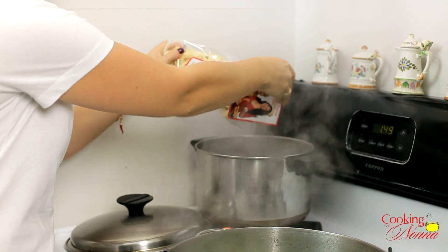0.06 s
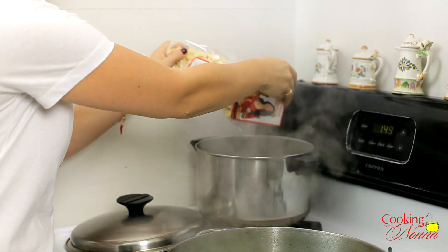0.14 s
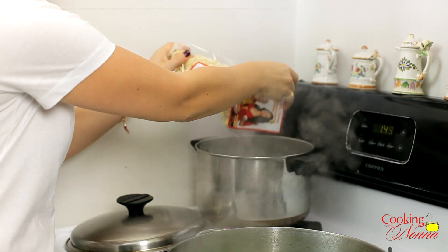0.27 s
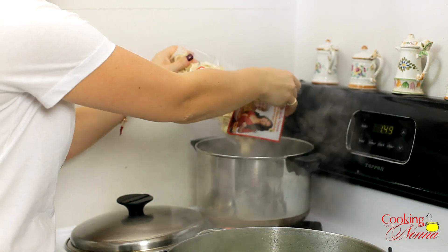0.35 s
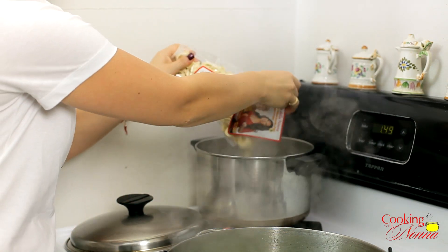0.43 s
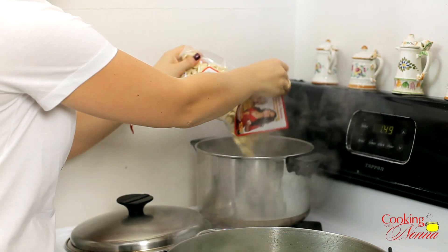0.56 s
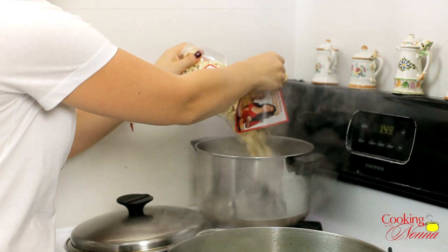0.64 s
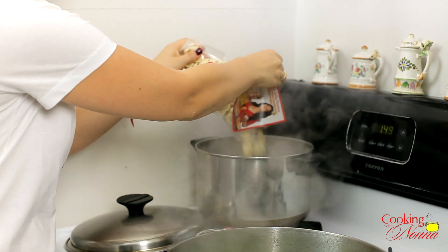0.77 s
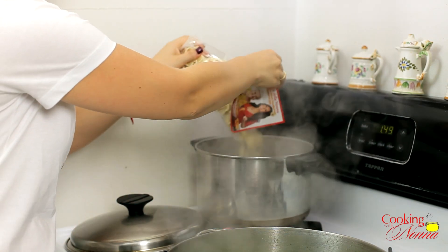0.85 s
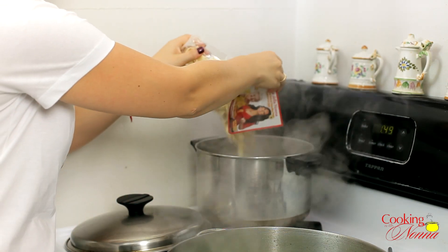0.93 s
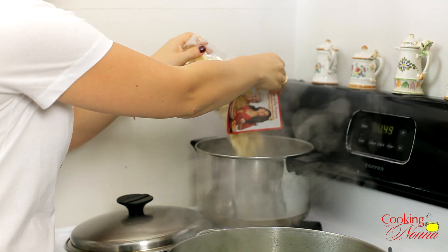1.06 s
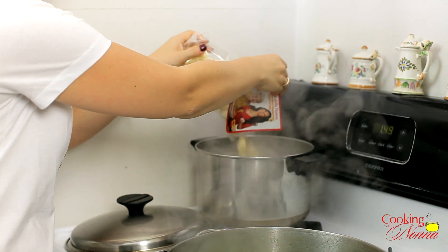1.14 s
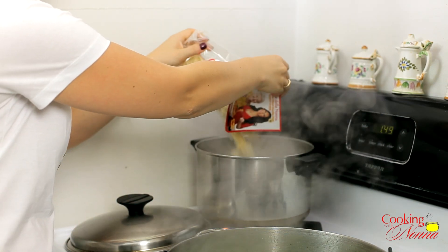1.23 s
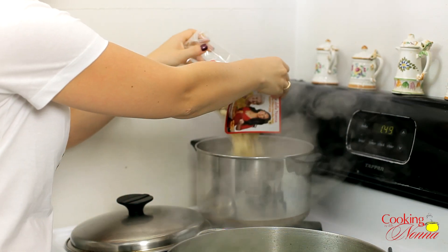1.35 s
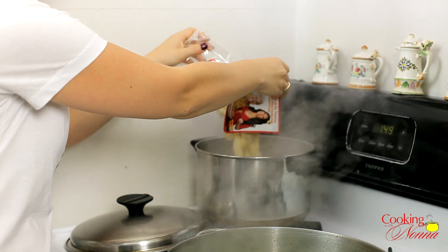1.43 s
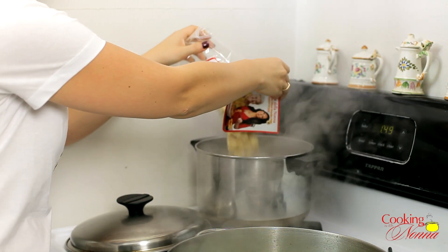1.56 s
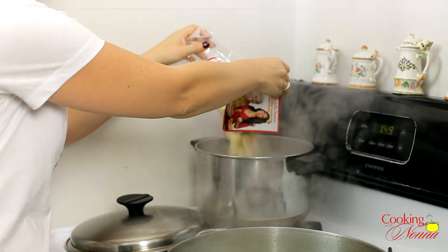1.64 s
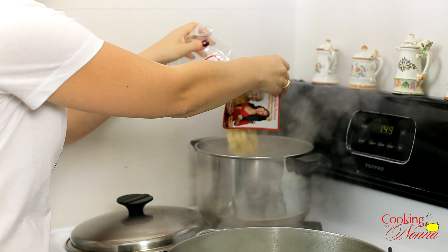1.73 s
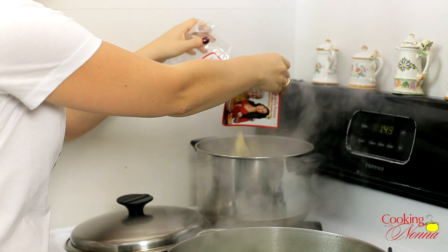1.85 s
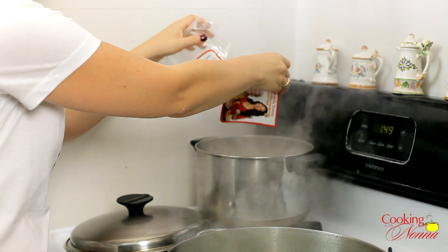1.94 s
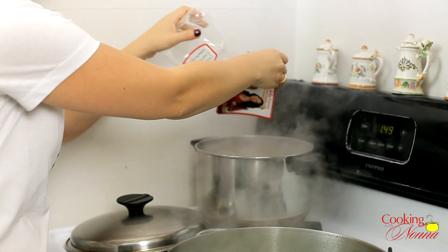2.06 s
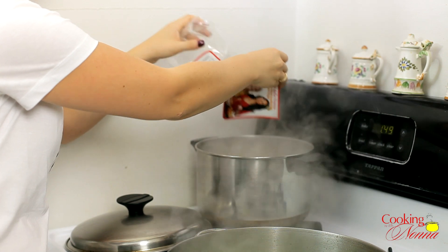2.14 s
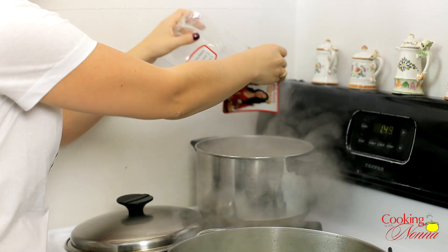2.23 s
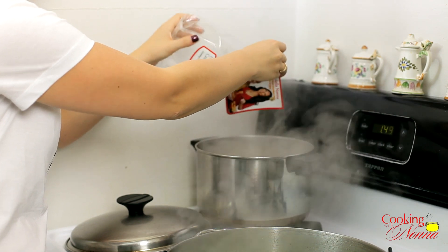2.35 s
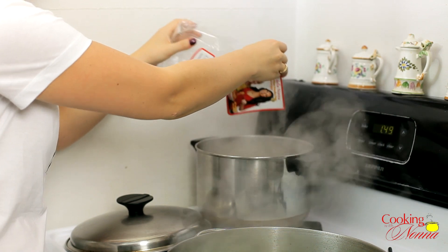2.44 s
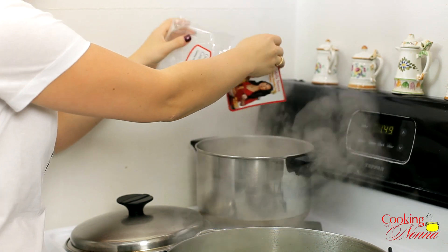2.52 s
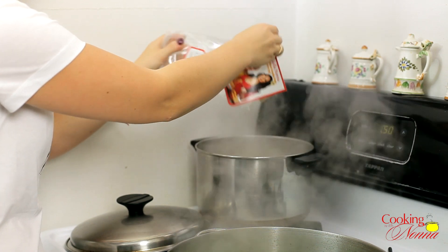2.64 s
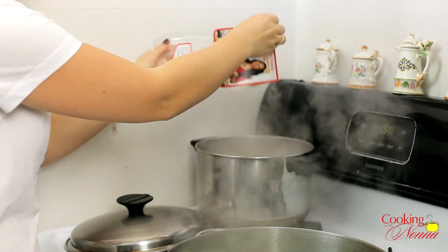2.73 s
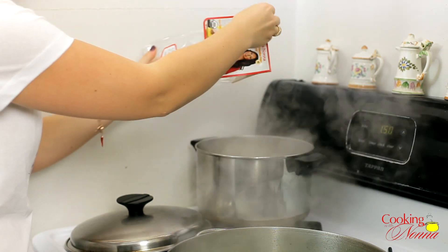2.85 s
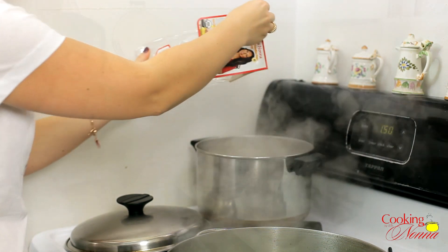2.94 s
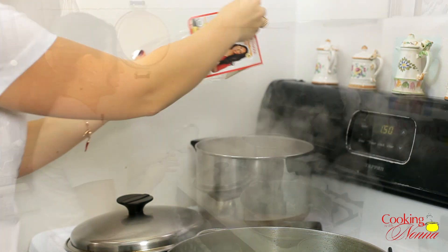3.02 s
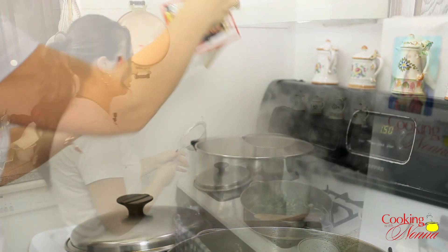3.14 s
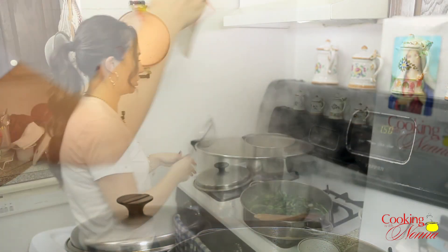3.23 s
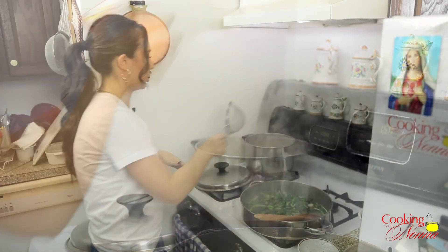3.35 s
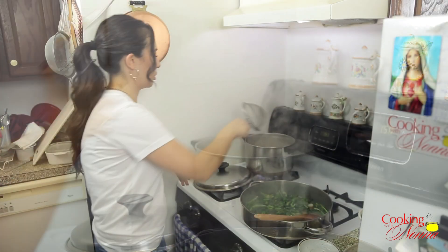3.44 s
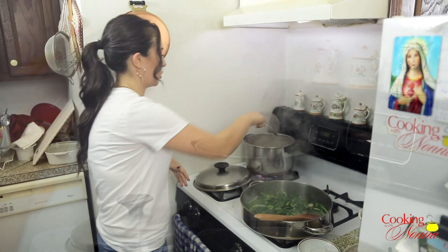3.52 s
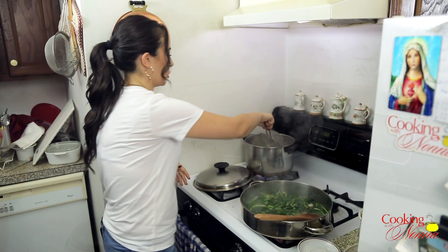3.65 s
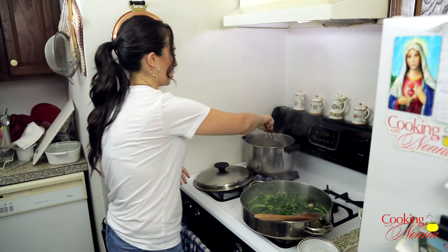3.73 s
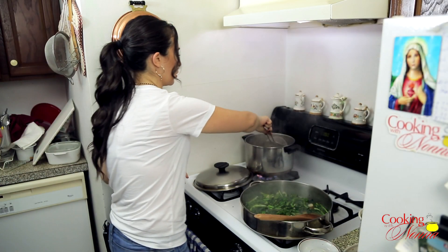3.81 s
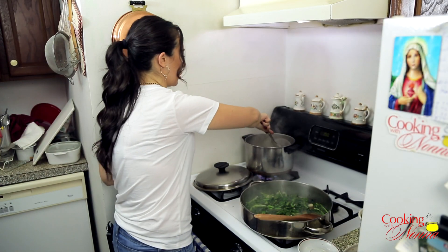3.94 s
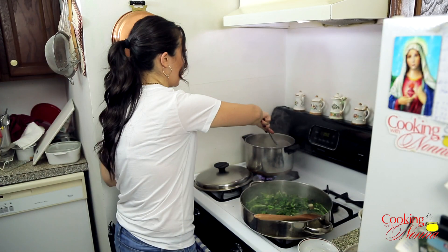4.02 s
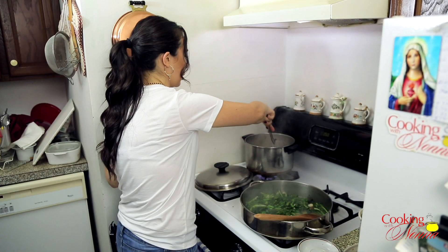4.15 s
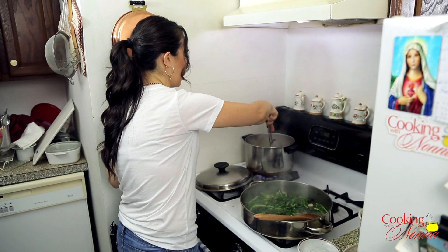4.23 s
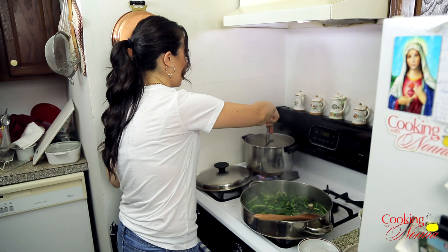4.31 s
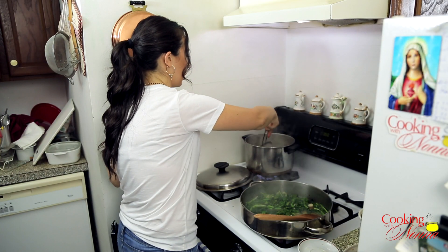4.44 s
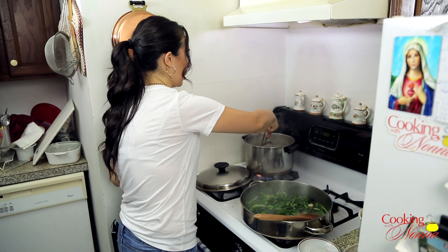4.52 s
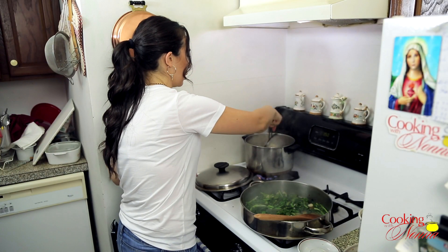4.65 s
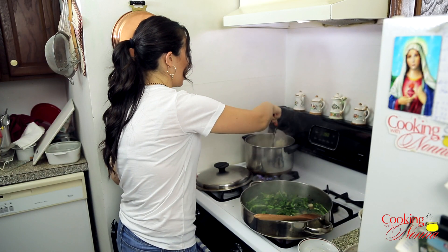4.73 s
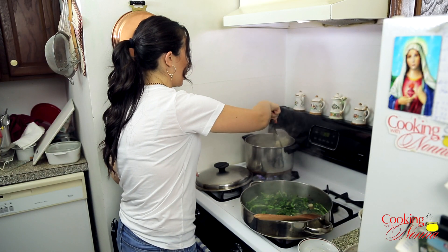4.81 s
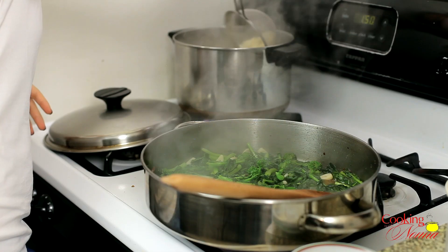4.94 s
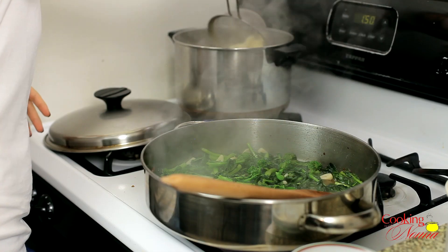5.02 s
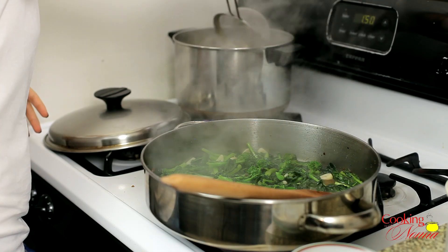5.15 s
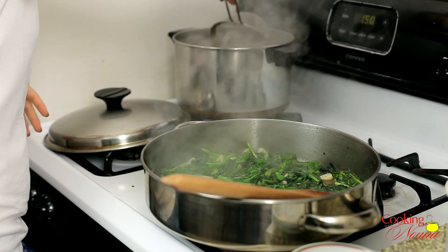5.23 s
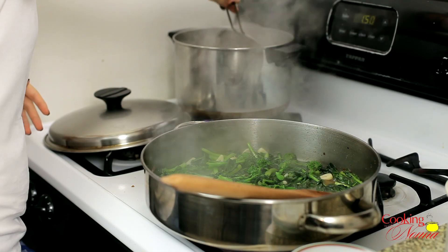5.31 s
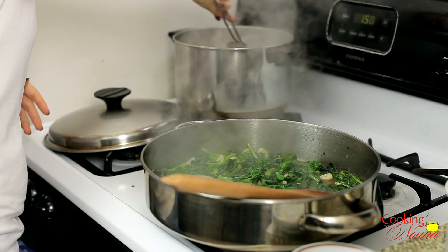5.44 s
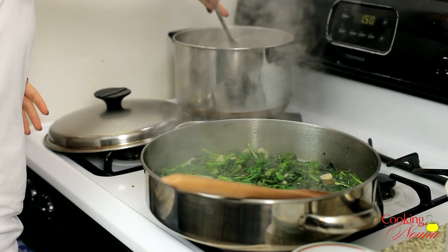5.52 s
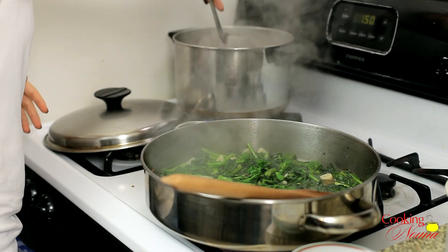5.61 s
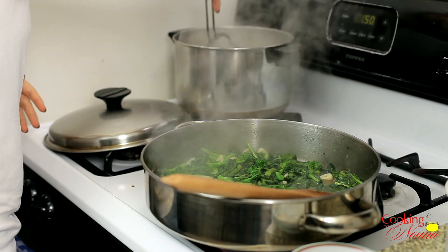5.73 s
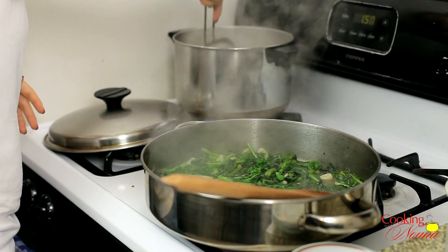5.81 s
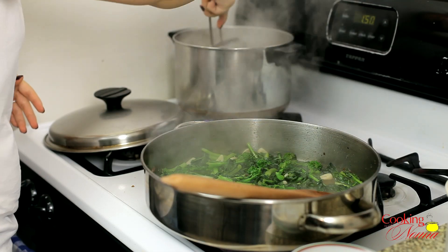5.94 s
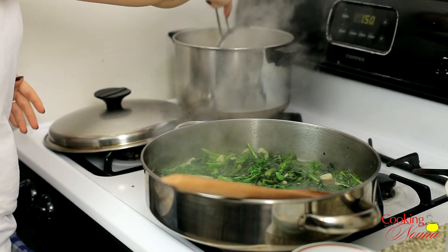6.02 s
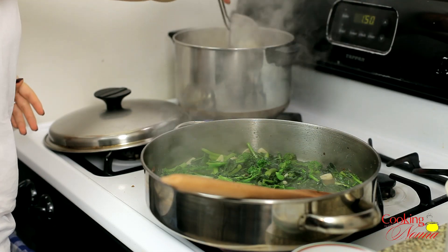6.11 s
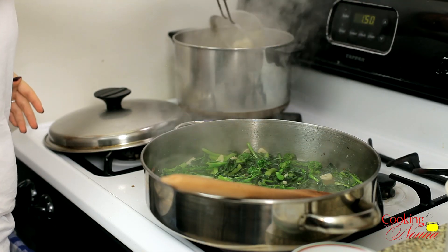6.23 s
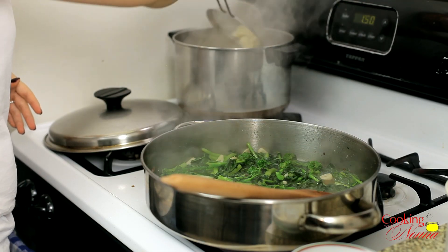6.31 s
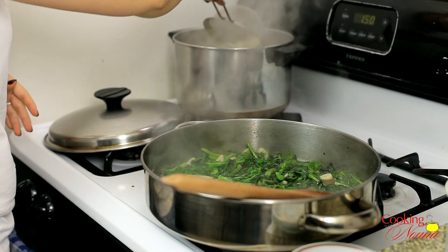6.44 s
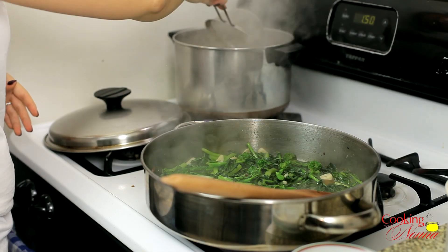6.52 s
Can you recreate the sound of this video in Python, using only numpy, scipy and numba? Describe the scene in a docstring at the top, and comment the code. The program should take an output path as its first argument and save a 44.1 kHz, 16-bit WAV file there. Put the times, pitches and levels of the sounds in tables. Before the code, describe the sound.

A plastic bag crackles sharply as dry pasta rattles into simmering water, then a metal skimmer plunges, knocks the pot and stirs quietly.

```python
"""A small kitchen in mono: from the start a pot simmers and a pan sizzles over a low rumble and appliance hum.
A plastic bag crackles as its film buckles; dry pasta slides out, rattling and plopping into the steel pot.
The empty bag is shaken and lifted away; after a soft bump, a metal skimmer plunges in and knocks on the pot.
It stirs a long, a short and a long stroke: filtered bubbles and noise, with air gulping behind the skimmer.
Close surfaces scatter the treble and the room adds a faint tail; the recorder cuts the top."""
import sys
import numpy as np
from scipy import signal
from scipy.fft import rfft, irfft
from scipy.io import wavfile
from scipy.ndimage import uniform_filter1d
from numba import njit

SR = 44100
rng = np.random.default_rng(int(sys.argv[2]) if len(sys.argv) > 2 else 0)


def store_pcm(level_fs):
    """Save levels as 16-bit WAV."""
    pcm = np.round(np.clip(level_fs, -1, 1) * 32767).astype(np.int16)
    wavfile.write(sys.argv[1], SR, np.atleast_2d(pcm).T)


N = 289737
TIME = np.arange(N) / SR

# shared level of simmer and sizzle, strongest at first: time_s, gain_db
STOVE_LEVEL = [(0, 9.5), (2.7, -1), (6.57, -0.4)]
# spectrum of the simmering water: frequency_hz, gain_db
SIMMER_COLOUR = [(30, -11), (90, -21.5), (160, -5), (230, -7.5), (350, -4), (440, -11), (550, -0.5),
                 (720, -15), (1050, -11), (1700, -22.5), (4500, -33.5)]
# spectrum of the fine sizzle in the pan: frequency_hz, gain_db
SIZZLE_COLOUR = [(1500, -9.5), (3500, -5.5), (5000, -8), (7500, -3.5), (9800, 4), (12000, -0.5),
                 (16000, -8.5)]
# level of the low rumble, which ends weaker: time_s, level_db
RUMBLE_LEVEL = [(0, -64.5), (3.6, -62), (4.3, -65), (6.57, -74.5)]
# spectrum of the rumble: frequency_hz, gain_db
RUMBLE_COLOUR = [(15, 0.5), (30, 6), (70, -6), (120, -4), (250, -30.5), (1000, -58)]
# hum of the kitchen's appliances: pitch_hz, mean_level_db
HUM = [(119.6, -73), (205, -71), (241, -73.5), (345, -75)]
SIMMER_WAVER_DB = 1.3

# the bag's film buckles: start_s, level_db, midrange_share_db, flap_share_db (both before trim), patch_pitch_hz
CRINKLES = [(0.001, -26.5, -12.5, -18.5, 920), (0.07, -25, -13, -32, 1110), (0.088, -21, -12.5, -24, 1090),
            (0.139, -18.5, -15, -19, 704), (0.261, -43, 1.5, -36, 1450), (0.274, -32, -6.5, -36, 1420),
            (0.299, -26, -9.5, -30, 1490), (0.372, -38, -2.5, -30, 730), (0.409, -38.5, -3.5, -26, 1090),
            (0.453, -35, -10.5, -24, 1760), (0.485, -21.5, -16.5, -14.5, 880),
            (0.519, -22, -20, -16.5, 805), (0.565, -30, -16, -44, 2260), (0.635, -18, -13.5, -26, 1800),
            (0.673, -16, -18.5, -22, 1500), (0.681, -16, -18.5, -23.5, 1120), (0.92, -21, -33, -25, 1100),
            (1.324, -25.5, -6.5, -16.5, 1000), (1.372, -16, -16, -27, 1000), (1.502, -16, -14.5, -25, 885),
            (1.89, -23, -29, -19, 1010), (2.145, -40.5, -11, -36, 1080), (2.196, -44.5, -15, -28, 1094),
            (2.248, -53, -5, -7, 2400), (2.307, -49, -25, -18, 1100), (2.353, -46.5, -25, -17, 1100),
            (2.489, -37, -4.5, -25, 1020), (2.5, -38.5, -1, -31, 1110), (2.58, -44, -8, -16, 1600),
            (2.613, -27.5, -9.5, -30, 2140), (2.816, -44, -2, -16, 840), (2.84, -30, -14, -12.5, 856),
            (2.851, -21, -18.5, -20, 840), (2.9, -33, -4.5, -27, 1000), (2.908, -35, -10, -31, 950),
            (2.919, -20, -10.5, -17.5, 895), (2.944, -29.5, -12, -26, 1800),
            (2.962, -34.5, -8.5, -35, 1090), (2.991, -54, -9, -30, 1400), (3.005, -39.5, -9, -31, 1100),
            (3.097, -28, -17, -19, 1100), (3.102, -23.5, -10.5, -25.5, 1140), (3.203, -57.5, 1.5, -10, 555),
            (3.264, -47.5, -15, -17, 1100)]
# the film slides in the hands: peak_s, level_db (before the mix of rub), rise_s, fall_s
RUSTLES = [(0.11, -44.5, 0.17, 0.06), (0.308, -32, 0.024, 0.018), (0.62, -36.5, 0.22, 0.046),
           (2.3, -64.5, 0.14, 0.1), (2.86, -33, 0.042, 0.022), (2.92, -36, 0.013, 0.042)]
# midrange spectrum of the film: frequency_hz, gain_db
FILM_MID_COLOUR = [(80, -26), (220, 0.5), (330, 0.5), (440, -4.5), (560, 1), (900, 0.5), (1200, -2),
                   (1700, -7), (2300, -9), (3200, -23.5), (9000, -24)]
# treble spectrum of the film: frequency_hz, gain_db
FILM_TOP_COLOUR = [(500, -23.5), (2000, -5), (3500, 1.5), (7000, 2.5), (10500, 5), (13000, 2.5),
                   (16000, -19.5)]
# high ring of a sharp crease: pitch_hz, width_hz, gain_db
CREASE_RING = [(9300, 2700, 0)]
SNAP_S, PATCH_Q = 0.001, 3.5  # decay of the sharp snap; sharpness of the buckling patch

# flow of pasta out of the bag: time_s, level_db
POUR_FLOW = [(0.56, -54), (0.65, -40.5), (0.83, -38.5), (0.95, -43), (1.135, -39), (1.17, -34), (1.45, -32),
             (1.52, -30), (1.87, -31.5), (2.02, -33.5), (2.045, -43.5), (2.08, -42)]
# clumps of pasta clack together: start_s, level_db (before trim), pitch_hz
CLACKS = [(0.604, -22.5, 5860), (0.767, -26.5, 8260), (0.802, -20.5, 3240), (0.823, -22.5, 7450),
          (0.891, -22.5, 7750), (0.9655, -26, 4880), (0.994, -23, 8140), (1.0768, -20, 7600),
          (1.1602, -17, 9800), (1.2328, -17, 8300), (1.261, -18, 10000), (1.312, -16.5, 9100),
          (1.597, -19, 9050), (1.736, -15.5, 9400), (1.893, -20, 8700), (1.932, -15.5, 7500),
          (1.963, -15, 9700), (2.016, -18, 9000), (2.0537, -25.5, 8500)]
# spectrum of pasta rattling: frequency_hz, gain_db
RATTLE_COLOUR = [(800, -8.5), (2000, -18.5), (4000, -4), (6000, 0.5), (8000, 4.5), (10000, 8), (11800, 0),
                 (16000, -16)]
# spectrum of pasta splashing: frequency_hz, gain_db
SPLASH_COLOUR = [(25, 1.5), (100, -3), (250, -1), (340, -1.5), (440, -6.5), (600, -1), (820, 0.5),
                 (1100, 2.5), (1700, -2), (3200, -6), (6000, -9.5)]
# air above the water in the pot: pitch_hz, width_hz, gain_db
POT_AIR = [(366, 50, -6), (586, 60, 5), (769, 26, -5.5), (972, 64, -8.5), (1205, 48, -8.5), (1394, 11, -3),
           (2170, 87, 0), (2476, 145, -4.5), (3300, 197, -4), (4100, 61, -13), (6320, 50, -11)]
CLATTER_HZ, CLATTER_WANDER_OCT = 8000, 0.28
RATTLE_POT_SHARE = 0.6  # gain of the pot's air in the rattle
RATTLE_DB, SPLASH_DB, SETTLE_S = -0.5, -1.04, 0.0093  # shares at mid pour; time for the water to calm
MID_POUR_S, HEAP_DB_PER_S = 1.41, 3.5  # as pasta heaps up in the pot, rattle gains and splash loses at this rate

# a soft, deep bump: start_s, peak_db
BUMPS = [(3.356, -47)]
BUMP_FIRST_HZ, BUMP_LAST_HZ, BUMP_FALL_S = 158, 45, 0.017

# pockets of air gulp behind the skimmer: peak_s, level_db, pitch_hz (at the peak)
GULPS = [(3.745, -58, 520), (4.04, -57.5, 1260), (4.41, -56.5, 1080), (4.55, -53, 505), (5.78, -62, 960),
         (5.91, -51.5, 523), (6.48, -54.5, 597)]
GULP_RISE_S, GULP_FALL_S, GULP_SAG_OCT_PER_S, GULP_Q = 0.018, 0.024, 1.5, 6

# the skimmer plunges in with a falling gulp: time_s, level_db, pitch_hz
PLUNGE = [(3.878, -61, 3000), (3.895, -50, 1920), (3.902, -42, 655), (3.925, -53, 603), (3.965, -69, 517)]
PLUNGE_Q = 6

# the skimmer meets the pot: start_s, level_db, hollow_share_db, ring_share_db, tick_share_db (shares before
# trim), bright_hz (favoured pitch of the ring)
KNOCKS = [(3.878, -42.5, -23, -8.5, -5, 6830), (3.898, -34, -12, -22, -15, 1920),
          (3.914, -25.5, -20, -8.5, -14.5, 6840), (3.923, -30.5, -8.5, -20, -24, 4330),
          (4.561, -45.5, -8, -24, -20, 3390), (5.094, -45.5, -11, -18, -9.5, 2160),
          (5.13, -46, -8, -12, -17, 3650), (5.219, -45.5, -5.5, -27, -10.5, 2000),
          (5.491, -36, -14.5, -11.5, -17.5, 1730), (6.353, -57, -25, -20, -1.5, 7060),
          (6.413, -59, -22, -10, 1.5, 3660), (6.463, -40, -11.5, -10, -22, 3300),
          (6.5, -45.5, -16, -7, -28, 2500), (6.519, -47, -17, -10.5, -28, 2480)]
# steel pot and skimmer, damped by water: pitch_hz, width_hz, gain_db
STEEL = [(1860, 60, 7), (2100, 34, 8.5), (2380, 200, -1.5), (2600, 91, 5), (2900, 130, -2), (3420, 130, -7),
         (3660, 270, -2.5), (3970, 60, -6), (4370, 82, -8), (4360, 84, -11), (6000, 110, -10),
         (6680, 79, -7), (7560, 61, -21)]
# spectrum of the pot's hollow thud: frequency_hz, gain_db
HOLLOW_COLOUR = [(100, -7), (320, 2), (440, -7), (620, -1), (800, -8), (1200, -2.5), (1700, -13),
                 (3000, -25), (8000, -22)]
# spectrum of the contact tick: frequency_hz, gain_db
TICK_COLOUR = [(800, -39), (2000, 3), (5000, -3), (7000, 4), (10000, 6), (16000, -5)]

# strokes of the skimmer through the water: start_s, length_s, slosh_db (before the mix of water), scrape_db
STROKES = [(3.93, 0.643, -61.5, -67), (5.066, 0.15, -61.5, -71), (5.495, 0.41, -57, -68)]
# spectrum of sloshing water: frequency_hz, gain_db
SLOSH_COLOUR = [(100, -41), (320, 8), (430, -4), (530, 6), (700, -5.5), (1200, -1), (1600, -19),
                (2500, -14), (5000, -17)]
# spectrum of the rim scraping on steel: frequency_hz, gain_db
SCRAPE_COLOUR = [(1000, -14), (2000, 7.5), (3300, -3), (4800, -4), (5800, -2), (6400, 0), (6900, 7.5),
                 (7600, 3), (10000, 3), (16000, -19)]
STROKE_ATTACK_S, STROKE_RELEASE_S, SCRAPE_WAVER_DB = 0.02, 0.034, 2.5
WAKE_HZ, WAKE_DEEP_HZ, WAKE_SINK_S = 1690, 1050, 0.12  # the hollow behind the skimmer deepens during a stroke

TOP_HZ = 16100  # the recorder's upper limit


def amp(db):
    """Decibels to gain."""
    return 10 ** (np.asarray(db) / 20)


def unit(x):
    """Scale to rms 1."""
    return x / np.sqrt(np.mean(x ** 2) + 1e-20)


def blow(x):
    """Scale a short sound to the energy of 5 ms at rms 1."""
    return x / np.sqrt(np.sum(x ** 2) / (SR * .005))


def add(track, s, sound):
    """Mix a sound into a track at time s."""
    i = max(int(s * SR), 0)
    track[i:i + len(sound)] += sound[:N - i]


def fader(curve):
    """Gain over time from time_s, level_db points, smoothed over 300 samples; silent outside them."""
    s, db = np.transpose(curve)
    return uniform_filter1d(amp(np.interp(TIME, s, db, left=-200, right=-200)), size=300)


def swell(s, rise_s, fall_s, hold_s=0):
    """Envelope that grows until time s, holds, and dies away."""
    before = np.maximum(s - TIME, 0)
    after = np.maximum(TIME - s - hold_s, 0)
    return np.exp(-before / rise_s - after / fall_s)


def walk(rate):
    """Random drift with a spread near 1, at rate steps per second; it holds still after 1000 steps."""
    return np.interp(TIME * rate, np.arange(1000), rng.standard_normal(1000))


def burst(t, fall_s, ragged_db):
    """A cluster of uneven micro-clicks that dies away."""
    hiss, uneven = rng.standard_normal((2, len(t)))
    steps = np.clip(np.repeat(uneven, 32)[:len(t)], -2, 2)  # a new level every 32 samples
    return hiss * amp(ragged_db * steps) * np.exp(-t / fall_s)


def grains(low_hz, high_hz, cycles, spread_db, glide, count, size):
    """Decaying rings at random times, a few much louder than the rest; a positive glide raises their pitch."""
    when, pitch, luck, sign = rng.random((count, 4)).T[:, :, None]
    turns = np.float32((low_hz + (high_hz - low_hz) * pitch) / SR) * np.arange(size, dtype=np.float32)
    age = turns / float(cycles)  # 1 when the ring has faded by 60 dB
    strength = np.sign(sign - .5) * amp(-spread_db * np.log(np.maximum(luck, np.exp(-4))))
    rings = np.exp(-float(np.log(1000)) * age) * np.sin(2 * np.pi * turns * (1 + float(glide) * age / 2))
    places = (when * N).astype(int) + np.arange(size)
    return np.bincount(places.ravel(), (strength * rings).ravel(), N)[:N]


def colour(x, points):
    """Causal minimum-phase filter through frequency_hz, gain_db points."""
    hz, db = np.transpose(points)
    size = 4096
    bins_hz = np.arange(size // 2 + 1) * SR / size
    log_gain = np.log(amp(np.interp(np.log(bins_hz + 1), np.log(hz), db)))
    cepstrum = irfft(log_gain)[:size // 2]
    cepstrum[1:] *= 2  # folding the cepstrum makes the filter causal
    response = irfft(np.exp(rfft(cepstrum, size)))
    return signal.fftconvolve(x, response)[:len(x)]


def resonate(x, modes):
    """Sum of resonances given as pitch_hz, width_hz, gain_db."""
    return sum(amp(db) * signal.lfilter(*signal.iirpeak(hz, hz / width, fs=SR), x) for hz, width, db in modes)


@njit
def moving_band(x, hz, q):
    """Band-pass whose centre moves with every sample."""
    y, band, low = np.empty(len(x)), 0., 0.
    for i in range(len(x)):
        g = np.tan(np.pi * hz[i] / SR)
        v = (band + g * (x[i] - low)) / (1 + g * (g + 1 / q))
        band, low, y[i] = 2 * v - band, low + 2 * g * v, v / np.sqrt(g)
    return y


def in_pot(x, share):
    """Part of a sound rings the air in the pot before it gets out."""
    return x + share * resonate(x, POT_AIR)


def stove():
    """Water simmers and fat sizzles finely in the pan, over a low rumble and the hum of appliances."""
    bubbles = grains(199, 1620, cycles=27, spread_db=2, glide=0.067, count=1500, size=2000)
    simmer = unit(colour(0.18 * unit(bubbles) + rng.standard_normal(N), SIMMER_COLOUR))
    simmer = simmer * amp(SIMMER_WAVER_DB * walk(9))
    rumble = unit(colour(rng.standard_normal(N), RUMBLE_COLOUR)) * amp(1.1 * walk(24)) * fader(RUMBLE_LEVEL)
    spits = grains(2700, 16000, cycles=4.5, spread_db=3.5, glide=0, count=9000, size=64)
    sizzle = unit(colour(.6 * unit(spits) + rng.standard_normal(N), SIZZLE_COLOUR))
    hum = np.zeros(N)
    for hz, db in HUM:
        level = amp(db + 2.2 * walk(2.94)) * np.sqrt(2)
        hum += level * np.sin(2 * np.pi * hz * TIME + 0.32 * walk(3.8))
    return (amp(-63.5) * simmer + amp(-70.5) * sizzle) * fader(STOVE_LEVEL) + rumble + hum


def bag():
    """Each buckle cracks, rattles the film and sends out a flap that falls in pitch as slower bending waves arrive."""
    out, t = np.zeros(N), np.arange(SR // 8) / SR
    turns = np.sqrt(t / .0105)  # square-root phase: the pitch falls
    flap = -np.sin(2 * np.pi * turns) * np.exp(-t / 0.021)
    for s, db, mid_db, flap_db, patch_hz in CRINKLES:
        snap = 0.35 * blow(burst(t, SNAP_S, 1.7)) + blow(burst(t, 0.0077, 3.2))
        crack = blow(colour(snap, FILM_TOP_COLOUR)) + 0.67 * blow(resonate(snap, CREASE_RING))
        patch = resonate(burst(t, 0.0097, 1.5), [(patch_hz, patch_hz / PATCH_Q, 0)])
        film = 0.88 * blow(colour(burst(t, 0.0085, 3.4), FILM_MID_COLOUR)) + 0.65 * blow(patch)
        crinkle = amp(-12.0) * blow(crack)
        crinkle += amp(mid_db + 1.73) * blow(film)
        crinkle += amp(flap_db + 3.5) * blow(flap)
        add(out, s, amp(db) * crinkle)
    creases = grains(330, 14600, cycles=2.0, spread_db=3.5, glide=0, count=7000, size=96)
    rub = unit(colour(creases, FILM_TOP_COLOUR)) * amp(-12.5)
    rub += unit(colour(rng.standard_normal(N), FILM_MID_COLOUR)) * amp(-8.5)
    sliding = sum(amp(db) * swell(s, rise_s, fall_s) for s, db, rise_s, fall_s in RUSTLES)
    return out + rub * sliding


def pasta():
    """Hard pieces tick against each other in surges, then plop into the water and ring the pot's air."""
    ticks = grains(1115, 15500, cycles=6.8, spread_db=1.5, glide=0, count=14000, size=256)
    # the pieces that collide keep changing in size, so the brightest pitch wanders
    bright_hz = np.clip(CLATTER_HZ * 2 ** (CLATTER_WANDER_OCT * walk(35)), SR / 20, SR / 3)
    clatter = moving_band(ticks, bright_hz, 5.1)
    rattle = unit(in_pot(colour(ticks, RATTLE_COLOUR), share=RATTLE_POT_SHARE))
    rattle = unit(rattle + 0.49 * unit(clatter)) * amp(0.79 * walk(54.5))

    plops = grains(230, 2430, cycles=6.4, spread_db=1.5, glide=0.29, count=3000, size=1000)
    slaps = rng.standard_normal(N) * amp(1.65 * walk(300))
    splash = unit(in_pot(colour(unit(plops) * 0.28 + unit(slaps), SPLASH_COLOUR), share=2.06))

    flow, heap_db = fader(POUR_FLOW), HEAP_DB_PER_S * (TIME - MID_POUR_S)
    calm = np.exp(-1 / (SETTLE_S * SR))
    churned = signal.lfilter([1 - calm], [1, -calm], flow)  # the water lags behind the flow
    out = amp(RATTLE_DB + heap_db) * rattle * flow + amp(SPLASH_DB - heap_db) * splash * churned

    t = np.arange(SR // 12) / SR
    for s, db, hz in CLACKS:
        contacts = burst(t, 0.016, 2.2)
        ring = resonate(contacts, [(min(hz, SR / 3), hz / 3, 0)])
        clack = blow(blow(colour(contacts, RATTLE_COLOUR)) + 2.1 * blow(ring))
        add(out, s, amp(db - 8.0) * clack)
    return out


def bump():
    """One deep, quickly damped thud whose pitch drops as it fades."""
    t = np.arange(SR // 5) / SR
    out, fade = np.zeros(N), np.exp(-t / BUMP_FALL_S)
    hz = BUMP_LAST_HZ + (BUMP_FIRST_HZ - BUMP_LAST_HZ) * fade ** 2
    for s, db in BUMPS:
        add(out, s, amp(db) * fade * np.sin(2 * np.pi * np.cumsum(hz) / SR))
    return out


def gulps():
    """Small pockets of air swell and close behind the skimmer, each sagging a little in pitch."""
    out = np.zeros(N)
    for s, db, hz in GULPS:
        pitch = hz * 2 ** (-GULP_SAG_OCT_PER_S * np.clip(TIME - s, -.5, .5))
        pocket = unit(moving_band(rng.standard_normal(N), pitch, float(GULP_Q)))
        out += amp(db) * pocket * swell(s, GULP_RISE_S, GULP_FALL_S)
    return out


def plunge():
    """The skimmer drags a large pocket of air under water; its resonance drops fast as it grows."""
    s, db, hz = np.transpose(PLUNGE)
    pocket = unit(moving_band(rng.standard_normal(N), np.interp(TIME, s, hz), float(PLUNGE_Q)))
    return pocket * fader(np.transpose([s, db]))


def knocks():
    """The skimmer chatters on the wall for a moment: a tick, a damped steel ring and a hollow thud from the pot."""
    out, t = np.zeros(N), np.arange(SR // 5) / SR
    for s, db, hollow_db, ring_db, tick_db, bright_hz in KNOCKS:
        # every spot on the wall favours the modes near one pitch
        modes = [(hz, width, mode_db - 12 * abs(np.log2(hz / bright_hz))) for hz, width, mode_db in STEEL]
        ring = resonate(burst(t, 0.013, 5.3), modes)
        hollow = in_pot(colour(burst(t, 0.017, 2.4), HOLLOW_COLOUR), share=1.0)
        tick = colour(burst(t, 0.007, 5.7), TICK_COLOUR)
        knock = amp(hollow_db + 1.5) * blow(hollow)
        knock += amp(ring_db - 2.0) * blow(ring)
        knock += amp(tick_db - 1.0) * blow(tick)
        add(out, s, amp(db) * knock)
    return out


def stirring():
    """Strokes churn up bubbles while the skimmer's rim scrapes the steel."""
    bubbles = grains(249, 2260, cycles=11.0, spread_db=3.5, glide=0.22, count=2500, size=1024)
    churn = unit(bubbles) + 2.2 * rng.standard_normal(N)
    slosh = unit(in_pot(colour(churn, SLOSH_COLOUR), share=0.39))
    roughness = amp(3.8 * walk(300) + SCRAPE_WAVER_DB * walk(30))
    scrape = unit(colour(rng.standard_normal(N) * roughness, SCRAPE_COLOUR))
    out = np.zeros(N)
    for s, length_s, slosh_db, scrape_db in STROKES:
        # the hollow behind the skimmer sounds lower as it deepens
        wake_hz = WAKE_DEEP_HZ + (WAKE_HZ - WAKE_DEEP_HZ) * np.exp(-np.maximum(TIME - s, 0) / WAKE_SINK_S)
        water = amp(-3.0) * slosh + amp(-10.5) * unit(moving_band(churn, wake_hz, 3.2))
        onset = np.clip((TIME - s) / STROKE_ATTACK_S, 0, 1)
        push = onset * swell(s, STROKE_ATTACK_S, STROKE_RELEASE_S, length_s)
        out += push * (amp(slosh_db) * water + amp(scrape_db) * scrape)
    return out


def kitchen(x, near_db, near_t60, far_db, far_t60):
    """Pots and stove top throw back a quick scatter of treble; the room adds a faint tail."""
    t = np.arange(SR // 2) / SR
    near, far = rng.standard_normal((2, len(t)))
    near = near * amp(-60 * t / near_t60) * (t > .002)  # close surfaces answer after 2 ms
    near = signal.sosfilt(signal.butter(2, 2500, "high", fs=SR, output="sos"), near)
    far = far * amp(-60 * t / far_t60) * (t > .012)  # the room answers after 12 ms
    response = (amp(near_db) * unit(near) + amp(far_db) * unit(far)) / np.sqrt(len(t))
    response[0] += 1  # direct sound
    return signal.fftconvolve(x, response / np.linalg.norm(response))[:N]


def scene():
    """Bag, pasta and skimmer in the kitchen, over the stove."""
    cooking = bag() + pasta() + bump() + gulps() + plunge() + knocks() + stirring()
    in_room = kitchen(cooking, near_db=-5, near_t60=0.017, far_db=-15.5, far_t60=0.17)
    return (in_room + stove())[None]


def record(dry):
    """The recorder cuts the top with a steep low-pass."""
    return signal.sosfilt(signal.ellip(10, .2, 70, TOP_HZ, fs=SR, output="sos"), dry)


dry = scene()
out = record(dry)
store_pcm(out)
```